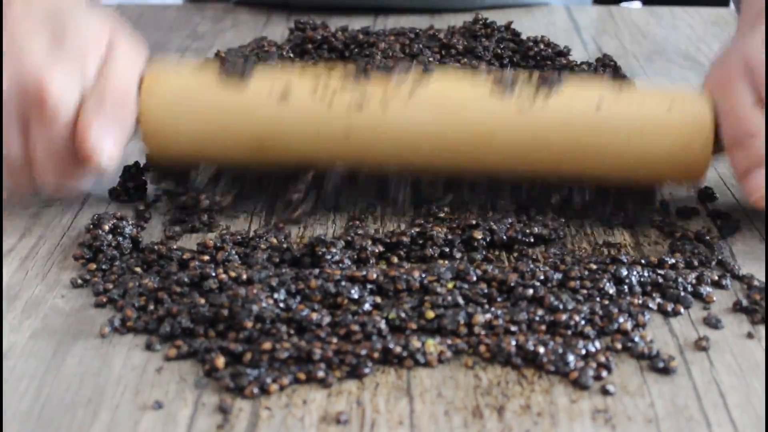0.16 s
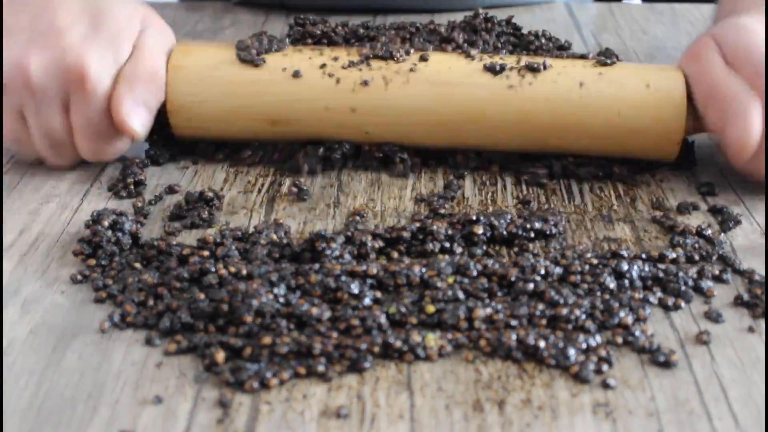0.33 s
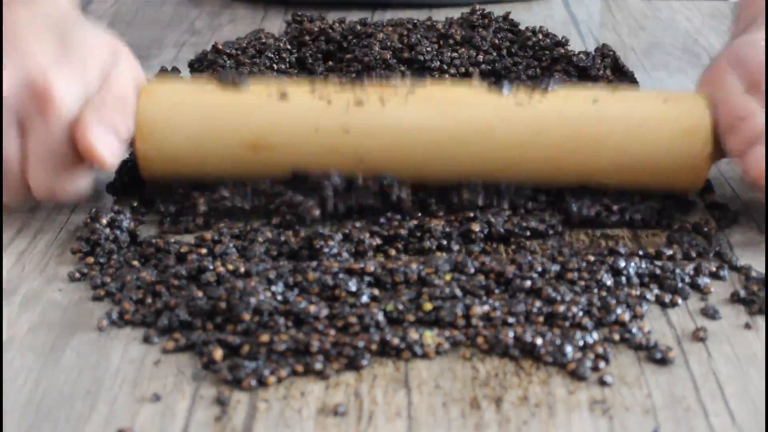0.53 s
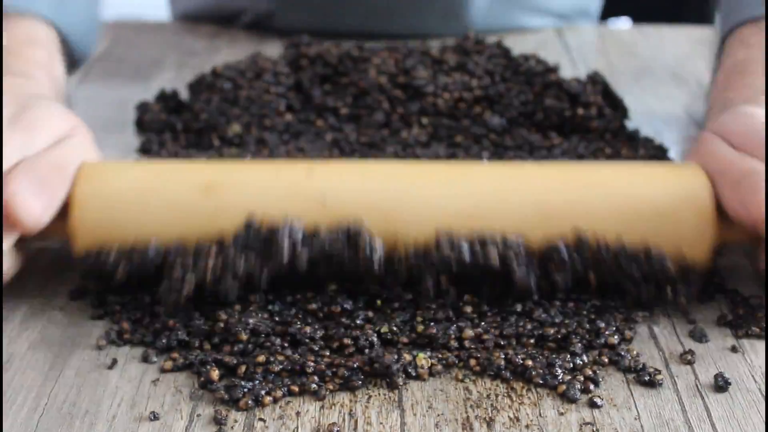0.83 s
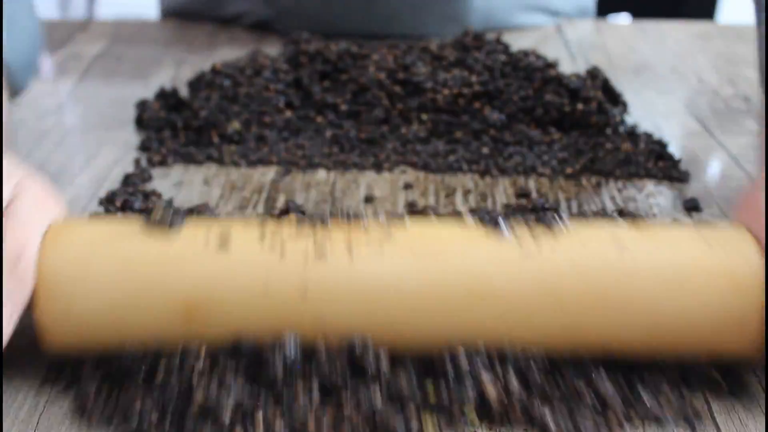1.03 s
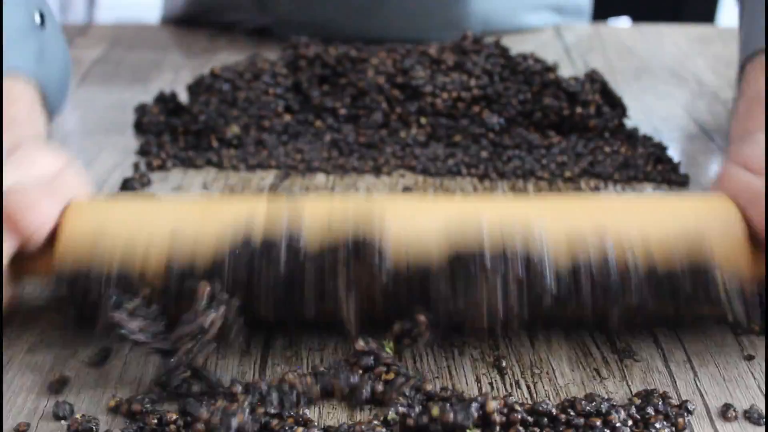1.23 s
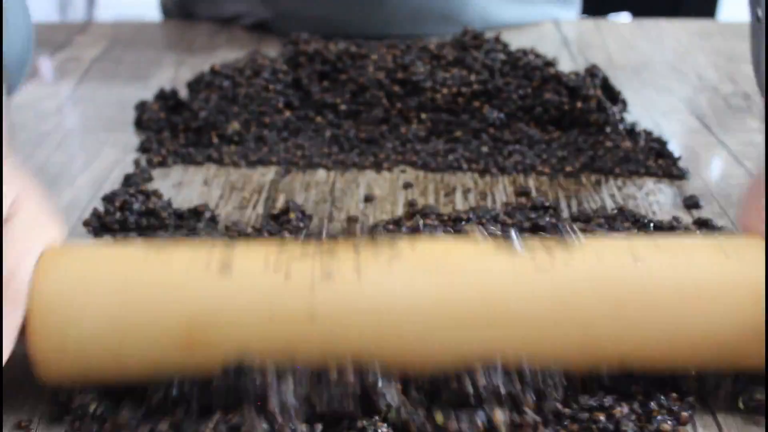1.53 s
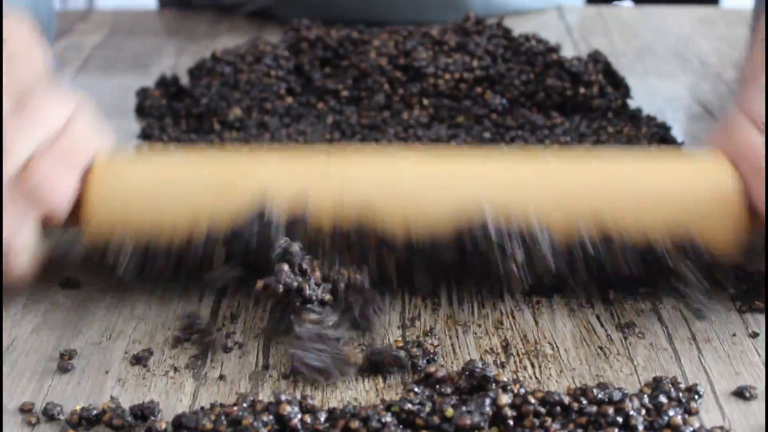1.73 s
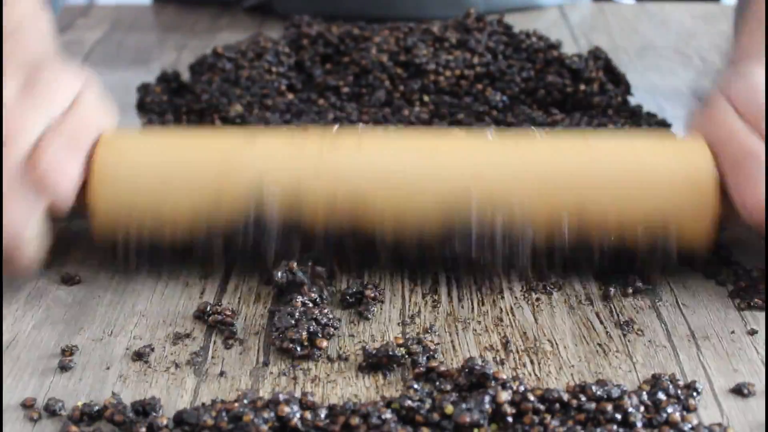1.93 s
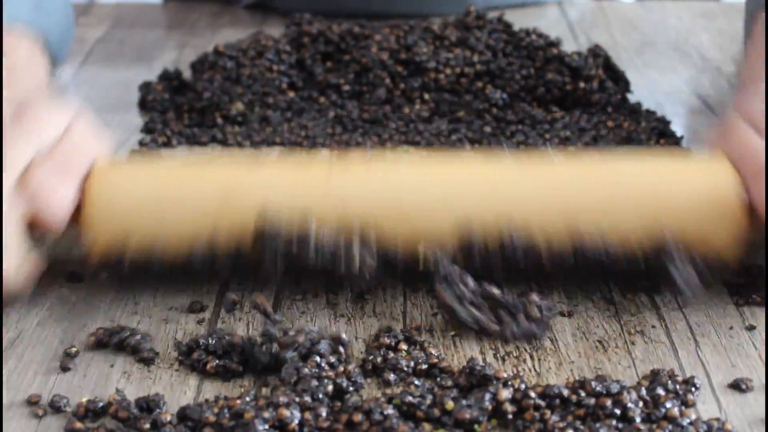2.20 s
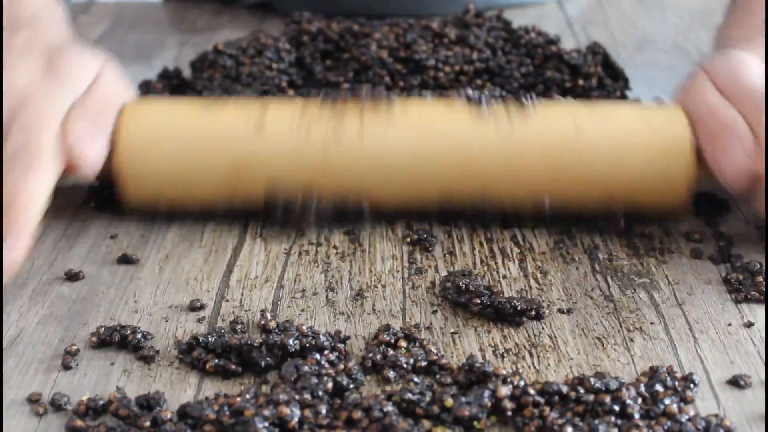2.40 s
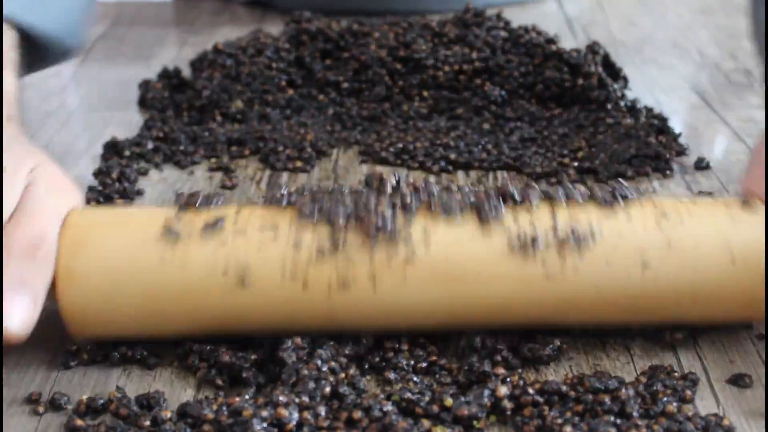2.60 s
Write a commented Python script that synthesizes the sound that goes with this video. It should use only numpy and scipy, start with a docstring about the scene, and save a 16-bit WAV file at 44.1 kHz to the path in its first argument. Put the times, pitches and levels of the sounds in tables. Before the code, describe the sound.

Hard roasted seeds crack and crunch under a wooden rolling pin thumping on a wooden counter

```python
"""Rolling pin crushing roasted seeds

A wooden rolling pin goes back and forth over hard roasted seeds on a wooden kitchen counter.
Seeds burst with sharp cracks made of random pulses, and the pin's thumps set low tones ringing.
In between, fragments crunch and the pin rumbles, both built from random tiny clicks.
The room rings briefly as fading noise, and the loudest cracks overload the microphone."""
import sys
import numpy as np
from scipy import signal
from scipy.fft import rfft, irfft
from scipy.io import wavfile

SR = 44100
rng = np.random.default_rng(int(sys.argv[2]) if len(sys.argv) > 2 else 0)


def persist_wave(psi):
    """Save psi, clipped to +-1, as 16-bit WAV."""
    counts = np.round(np.clip(psi, -1, 1) * 32767).astype(np.int16)
    wavfile.write(sys.argv[1], SR, np.atleast_2d(counts).T)


N = 121275   # length in samples: 2.75 s

# How the rolling swells and fades, before the overall level of each layer is added.
# Columns: time_s, crackle_db, crunch_db, rumble_db
ROLLING_LEVELS = [(0, -35, -25, -8), (0.041, -44, -29, -23), (0.11, -42.5, -41, -32),
                  (0.28, -70, -59, -42.5), (0.343, -65, -66, -35), (0.349, -48.5, -56, -42.5),
                  (0.411, -35, -32, -13.5), (0.468, -29, -29.5, -16.5), (0.539, -44, -36, -32),
                  (0.68, -66.5, -56.5, -43), (0.77, -56, -58.5, -45.5), (0.832, -64, -73, -56),
                  (0.842, -45, -43, -38), (0.899, -45, -47, -33), (0.93, -38, -20, -10.5),
                  (0.968, -43, -41.5, -29.5), (1.0, -50, -31.5, -23), (1.09, -40.5, -38.5, -31),
                  (1.2, -54.5, -52, -38), (1.26, -47, -39.5, -26.5), (1.33, -33.5, -34.5, -27),
                  (1.399, -52.5, -35, -37), (1.469, -54, -48.5, -30.5), (1.558, -37, -32, -19.5),
                  (1.69, -59.5, -55, -37.5), (1.76, -40, -31, -22), (1.79, -40, -44, -31.5),
                  (1.83, -33, -29.5, -16.5), (1.88, -40, -31, -24), (1.96, -41.5, -34.5, -27.5),
                  (2.018, -29, -32, -9.5), (2.1, -31.5, -36, -26), (2.169, -43, -41, -28),
                  (2.21, -41.5, -41, -19), (2.248, -30, -25.5, -7.5), (2.291, -36, -36, -20),
                  (2.35, -33.5, -32, -42), (2.42, -45.5, -37.5, -30.5), (2.53, -44, -39.5, -26),
                  (2.599, -45, -54, -36), (2.68, -54, -53, -42), (2.75, -34, -29.5, -7)]
# Each seed that bursts, before the overall levels of knocks and thumps are added.
# Columns: start_s, crack_db, crack_pitch_hz, crack_decay_s, knock_db, thump_db
SEED_BURSTS = [ (.0075, -2, 2860, 0.002, -8, -9), (0.0501, -13, 3450, 0.006, -9, -2),
               (0.0543, -1, 2560, 0.0026, -6.5, -1.5), (0.0604, -32, 2930, .0008, -22, -7),
               (0.085, -25, 5000, .0004, -41, -24), (0.391, -42, 2560, 0.00027, -18.5, -33),
               (0.4086, -45, 2940, 0.00061, -14, -31), (0.4269, -5.5, 3060, 0.0016, -6, -7),
               (.4387, -5.5, 4100, 0.0028, -16.5, -8), (0.4474, -4.5, 3650, 0.0009, -7, -10),
               (0.4546, -12, 4500, 0.00076, -14, -11), (.4604, -7, 3700, 0.002, -7.5, -10.5),
               (0.4698, -7.5, 2780, 0.0011, -16, -9.5), (0.9193, -34, 2200, 0.0005, -14.5, -24),
               (0.991, -38, 2200, 0.00063, -22.5, -20), (1.322, -28, 2600, 0.00072, -25, -43),
               (1.0135, -2, 3200, 0.0028, -1, 0.5), (1.3492, -2, 4800, 0.00056, -9, -2),
               (1.5013, -8.5, 5000, 0.0014, -7, -5), (1.7514, -28, 2260, .0007, -18, -18),
               (1.808, -34, 1690, 0.00074, -18.5, -30), (1.891, -44, 2266, .001, -32, -37),
               (1.9096, -15, 3240, 0.0027, -11.5, -12.5), (1.9176, -23, 3200, 0.0014, -13.5, -12),
               (1.984, -21, 5760, 0.00039, -16.5, -11), (1.9992, -10, 5100, 0.00058, -21.5, -8),
               (2.1847, -33.5, 1500, 0.00062, -21, -14), (2.311, -5.5, 2160, .001, 0.5, -3.5),
               (2.4506, -16, 1380, 0.00032, -6, 6.5), (2.4586, -2, 4000, 0.00052, -3.5, 5.5),
               (2.699, -31.5, 6300, .0004, -57, -48), (2.719, -24.5, 6700, 0.00085, -24.5, -28),
               (2.7462, -20, 5200, 0.00092, -31, -20)]
# The pin slips off a heap and bumps the counter. Columns: start_s, level_db
PIN_BUMPS = [(0.3241, -26), (0.4173, -6.5), (0.9275, -2.5), (1.3248, -6), (1.5555, -10.5), (2.0092, -17),
             (2.0222, -12), (2.0602, -6), (2.2362, -4.5), (2.2629, -3.5), (2.2698, -8), (2.7132, -13),
             (2.7284, -23)]
# Low ringing tones of a thump: short ones from the counter, long faint ones from the room.
# Columns: pitch_hz, level_db, t60_s (time to fade by 60 dB)
THUMP_TONES = [(84.4, -29.5, 0.078), (147.7, -29, 0.44), (218, -21, 0.038), (251.6, -29.5, 0.63),
               (276, -1.5, 0.038), (347.4, -4, 0.046), (455, -8.5, 0.02)]

# Tone colours: only the shape counts, as the level is set elsewhere.
# Columns of these five: frequency_hz, level_db (per Hz)
KNOCK_COLOUR = [(120, -32.5), (300, -7), (500, 2), (700, -1), (900, 4), (1400, 1), (2200, 1.5),
                (2900, -4.5), (4000, -13), (8000, -25.5), (16000, -69.5)]
CRACKLE_COLOUR = [(1500, 16), (2800, 3.5), (4800, 6.5), (7000, 0), (10000, -11), (16000, -16)]
CRUNCH_COLOUR = [(250, -19), (500, 2), (850, 1), (1400, -3.5), (2300, -11.5), (3200, -13.5), (6000, -37.5)]
RUMBLE_COLOUR = [(25, -37.5), (55, -34.5), (85, -14.5), (115, -10.5), (160, -8.5), (250, 5.5), (345, -1),
                 (460, -2), (700, -23), (1500, -68.5)]
BACKGROUND_COLOUR = [(25, -25), (100, 0.5), (220, 8.5), (500, -15.5), (2000, -19.5), (6000, -27),
                     (16000, -48)]

# Strength of the kitchen's ringing. Columns: frequency_hz, level_db
ROOM_LEVELS = [(60, -59), (140, -8.5), (270, -15), (600, -9), (1200, -16.5), (2200, -9), (4500, -14.5),
               (9000, -15.5), (16000, -39)]
# How long the kitchen rings. Columns: frequency_hz, t60_s
ROOM_FADES = [(100, 1), (260, 0.45), (700, 0.58), (2000, 0.37), (5000, 0.12), (14000, 0.25)]

# Rolling: overall level, average number of grains per second, spread of grain sizes
CRACKLE_DB, CRACKLE_PER_S, CRACKLE_SPREAD_DB = 1.5, 7000, 3.0
CRUNCH_DB, CRUNCH_PER_S, CRUNCH_SPREAD_DB = 1, 1400, 2.5
RUMBLE_DB, RUMBLE_PER_S, RUMBLE_SPREAD_DB = -3.5, 350, 1

# Cracks: first snap against the rattle, and broad splintering against the shell's tone
SNAP_DB, SPLINTER_DB = 4, -22
SPLINTER_LOW_HZ, SPLINTER_HIGH_HZ = 900, 6000
SHELL_WIDTH = 0.65       # width of the shell's resonance, as a share of its pitch
CRACK_TOP_HZ = 9560      # the cracks fade above this

# Knocks: the snap is a plain factor
KNOCK_DB, KNOCK_DECAY_S, KNOCK_SNAP = -1, 0.0033, 0.37

# Thumps: the pin lands softly, just after the shell gives
THUMP_DB, DROP_DELAY_S = -1.5, 0.00077
THUMP_LOW_HZ, THUMP_HIGH_HZ = 81, 1500
TONE_SCATTER_DB = 3.45   # how much each tone varies from blow to blow

# Kitchen: quick reflections, the wait before the tail, and how much of each sound reaches the room
EARLY_DB, EARLY_T60_S, EARLY_GAP_S = -7.5, 0.094, 0.00168
EARLY_LOW_HZ, EARLY_HIGH_HZ = 490, 6200
TAIL_GAP_S = 0.0069
CRACK_ROOM_DB, KNOCK_ROOM_DB, THUMP_ROOM_DB = -3.5, -0.5, -2.5

BACKGROUND_DB = -50.5
CLIP_KNEE = 6            # higher flattens the peaks more abruptly
CUTOFF_HZ = 16000


def from_db(db):
    """Turn decibels into a plain factor."""
    return 10 ** (np.asarray(db) / 20)


def rms_one(x):
    """Scale a sound so its average strength (rms) is one."""
    return x / np.sqrt(np.mean(x ** 2) + 1e-20)


def at_hz(points, hz):
    """Read a table between its points, on a log-frequency axis."""
    table_hz, values = np.transpose(points)
    return np.interp(np.log(np.maximum(hz, 1)), np.log(table_hz), values)


def colour(x, spectrum):
    """Give a sound a tone colour with a filter that never acts early; the result has unit rms."""
    size = 4096
    hz = np.arange(size // 2 + 1) * SR / size
    # Folding the cepstrum puts the filter's energy as early as possible.
    cepstrum = irfft(np.log(from_db(at_hz(spectrum, hz))))
    cepstrum[1:size // 2] *= 2
    cepstrum[size // 2 + 1:] = 0
    response = irfft(np.exp(rfft(cepstrum)))
    return rms_one(signal.fftconvolve(x, response)[:N])


def butter(x, order, hz, kind):
    """Pass a sound through a plain low, high or band filter."""
    b, a = signal.butter(order, hz, kind, fs=SR)
    return signal.lfilter(b, a, x)


def resonance(hz, r):
    """Filter terms for a tone that shrinks by the factor r each sample."""
    return [1, -2 * r * np.cos(2 * np.pi * hz / SR), r * r]


def add(out, start_s, sound):
    """Mix a sound in at its start time."""
    i = int(np.clip(start_s * SR, 0, N - 1))
    out[i:i + len(sound)] += sound[:N - i]


def struck(tones, times, db):
    """Blows set tones ringing, each tone with its own random strength per blow."""
    out = np.zeros(N)
    scatter = TONE_SCATTER_DB * rng.standard_normal((len(times), len(tones)))
    samples = np.clip(times * SR, 0, N - 1).astype(int)
    for k, (hz, level_db, t60) in enumerate(tones):
        clicks = np.zeros(N) + 1e-18
        np.add.at(clicks, samples, from_db(db + level_db + scatter[:, k]))
        r = from_db(-60 / (t60 * SR))
        out += signal.lfilter([0, np.sin(2 * np.pi * hz / SR)], resonance(hz, r), clicks)
    return out


def grains(spectrum, per_s, spread_db):
    """Random tiny fractures, many small and a few large, coloured to unit rms."""
    sizes = from_db(spread_db * np.minimum(rng.exponential(1, N), 4))
    signs = rng.choice([-1, 1], N)
    happens = rng.random(N) < per_s / SR
    return colour(sizes * signs * happens, spectrum)


def fracture(decay_s, snap, diffuse):
    """A first snap and a dying rattle, of unit energy; summed over all directions it acts as one click."""
    t = np.arange(SR // 30) / SR
    pulses = rng.choice([-1, 1], len(t)) * np.exp(-t / decay_s) * (not diffuse)
    pulses[0] = 1 + snap * np.linalg.norm(pulses)
    return pulses / np.linalg.norm(pulses)


def background():
    """The quiet background is steady noise with its own tone colour."""
    return from_db(BACKGROUND_DB) * colour(rng.standard_normal(N), BACKGROUND_COLOUR)


def room_tail(t):
    """The room's ringing is bands of noise, each fading at its own rate."""
    edges = np.geomspace(45, 18000, num=22)
    white = rng.standard_normal((2, SR))   # neighbouring bands use different noise
    tail = np.zeros(SR)
    for k, (low, high) in enumerate(zip(edges, edges[1:])):
        hz = np.sqrt(low * high)
        sos = signal.butter(2, [low, high], "band", fs=SR, output="sos")
        band = signal.sosfilt(sos, white[k % 2])
        band = band * (t > TAIL_GAP_S) * from_db(-60 * t / at_hz(ROOM_FADES, hz))
        tail += from_db(at_hz(ROOM_LEVELS, hz)) * rms_one(band) * np.sqrt(2 * (high - low)) / SR
    return tail


def quick_reflections(t):
    """Counter and cupboards send back dense reflections: a short burst of fading noise."""
    early = rng.standard_normal(SR) * (t > EARLY_GAP_S) * from_db(-60 * t / EARLY_T60_S)
    early = butter(rms_one(early), 1, [EARLY_LOW_HZ, EARLY_HIGH_HZ], "band")
    return from_db(EARLY_DB) * early / np.sqrt(SR)


def kitchen(x):
    """Every sound sent into the room returns as quick reflections and a longer tail."""
    t = np.arange(SR) / SR
    return signal.fftconvolve(x, room_tail(t) + quick_reflections(t))[:N]


def rolling():
    """Fragments crackle and crunch under the pin, which rumbles over them."""
    time_s, *columns = np.transpose(ROLLING_LEVELS)
    t = np.arange(N) / SR
    crackle_db, crunch_db, rumble_db = [np.interp(t, time_s, column) for column in columns]
    crackle = grains(CRACKLE_COLOUR, CRACKLE_PER_S, CRACKLE_SPREAD_DB)
    crunch = grains(CRUNCH_COLOUR, CRUNCH_PER_S, CRUNCH_SPREAD_DB)
    rumble = grains(RUMBLE_COLOUR, RUMBLE_PER_S, RUMBLE_SPREAD_DB)
    return (from_db(crackle_db + CRACKLE_DB) * crackle
            + from_db(crunch_db + CRUNCH_DB) * crunch
            + from_db(rumble_db + RUMBLE_DB) * rumble)


def thumps():
    """The pin drops when a seed gives way or a heap slips; counter and room ring with low tones."""
    burst_s, _, _, _, _, burst_db = np.transpose(SEED_BURSTS)
    bump_s, bump_db = np.transpose(PIN_BUMPS)
    times = np.r_[burst_s + DROP_DELAY_S, bump_s]
    boom = struck(THUMP_TONES, times, np.r_[burst_db, bump_db])
    boom = butter(boom, 1, THUMP_HIGH_HZ, "low")
    boom = butter(boom, 2, THUMP_LOW_HZ, "high")
    return -from_db(THUMP_DB) * boom   # minus: the wave is upside down


def knocks(diffuse):
    """The broken shell rattles against the pin for a few milliseconds: a dry, pitchless knock."""
    out = np.zeros(N)
    for start_s, _, _, _, db, _ in SEED_BURSTS:
        rattle = fracture(KNOCK_DECAY_S, KNOCK_SNAP, diffuse)
        add(out, start_s, from_db(db + KNOCK_DB) * rattle * np.sqrt(KNOCK_DECAY_S / 2 * SR))
    return colour(out, KNOCK_COLOUR) * np.std(out)   # keep the strength it had before colouring


def cracks(diffuse):
    """Each shell snaps and briefly splits on, through its resonance and as broad splinters."""
    out = np.zeros(N)
    for start_s, db, hz, decay_s, _, _ in SEED_BURSTS:
        split = fracture(decay_s, from_db(SNAP_DB), diffuse)
        r = np.exp(-np.pi * SHELL_WIDTH * hz / SR)
        shell = signal.lfilter([1, -1], resonance(hz, r), split)
        splinters = butter(split, 1, [SPLINTER_LOW_HZ, SPLINTER_HIGH_HZ], "band")
        burst = rms_one(shell) + from_db(SPLINTER_DB) * rms_one(splinters)
        burst = burst / np.linalg.norm(burst)
        # A longer crack carries more energy.
        add(out, start_s, from_db(db) * burst * np.sqrt(decay_s / 2 * SR))
    return butter(out, 2, CRACK_TOP_HZ, "low")


def scene():
    """Pin, seeds and counter sound directly and through the kitchen, over its quiet background."""
    thump, roll = thumps(), rolling()
    direct = cracks(False) + knocks(False) + thump + roll
    sent_to_room = (from_db(CRACK_ROOM_DB) * cracks(True)
                    + from_db(KNOCK_ROOM_DB) * knocks(True)
                    + from_db(THUMP_ROOM_DB) * thump
                    + roll)
    mix = background() + kitchen(sent_to_room) + direct
    return mix[None]   # one channel


def record(dry):
    """The overloaded microphone flattens the loudest peaks; the top of the treble is cut."""
    clipped = dry / (1 + np.abs(dry) ** CLIP_KNEE) ** (1 / CLIP_KNEE)
    treble_cut = signal.butter(20, CUTOFF_HZ, fs=SR, output="sos")
    return signal.sosfiltfilt(treble_cut, clipped)


dry = scene()
out = record(dry)
persist_wave(out)
```